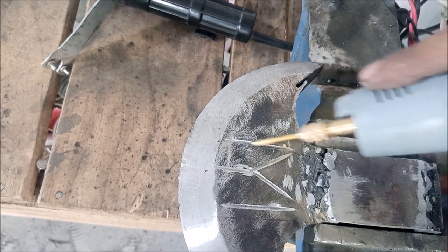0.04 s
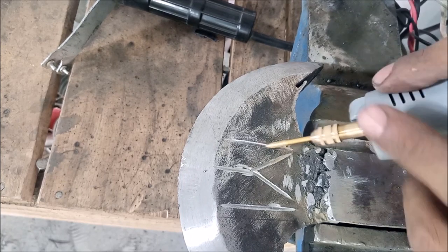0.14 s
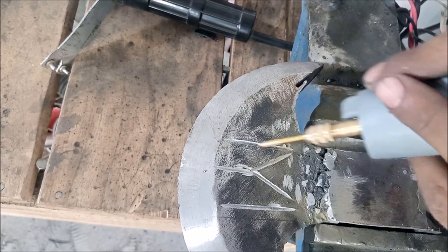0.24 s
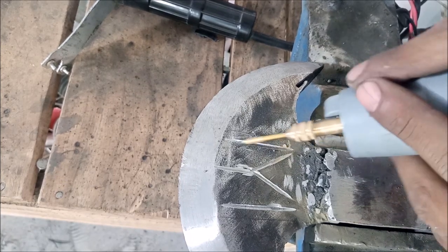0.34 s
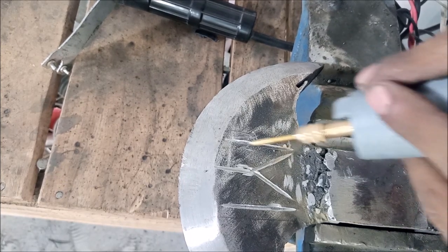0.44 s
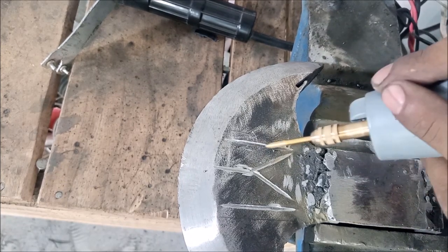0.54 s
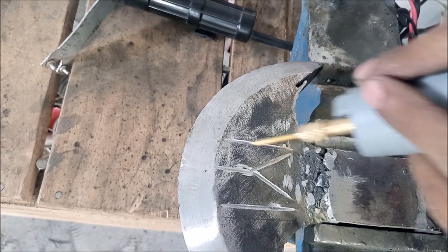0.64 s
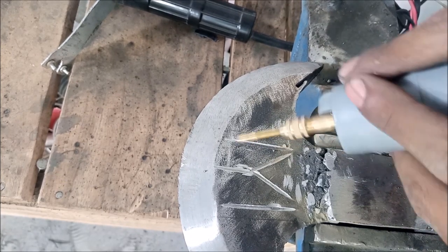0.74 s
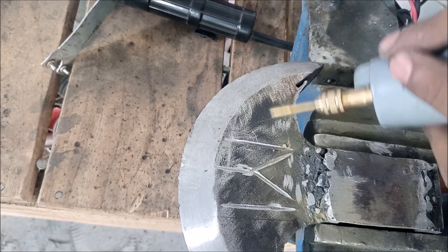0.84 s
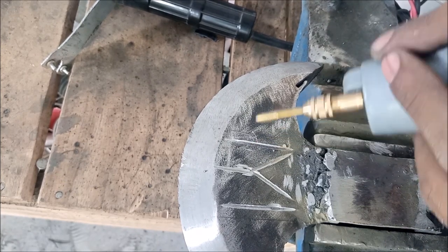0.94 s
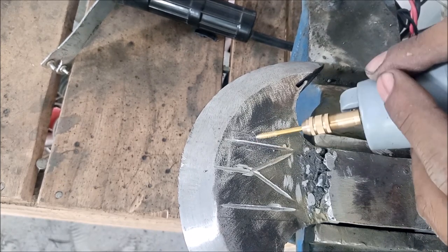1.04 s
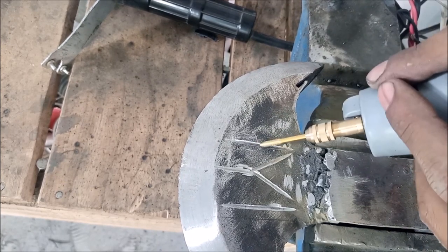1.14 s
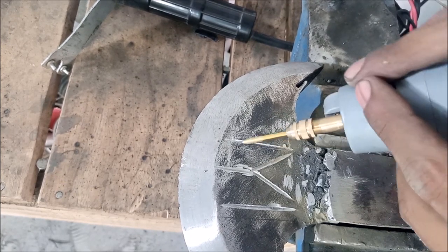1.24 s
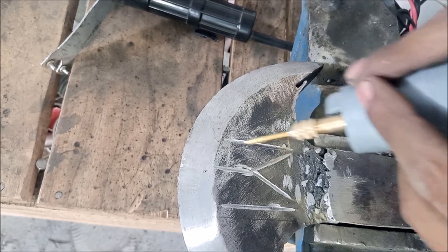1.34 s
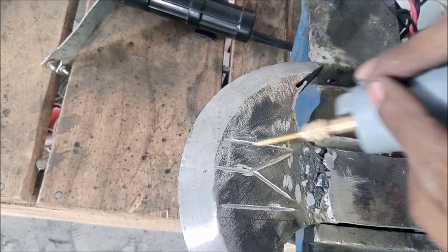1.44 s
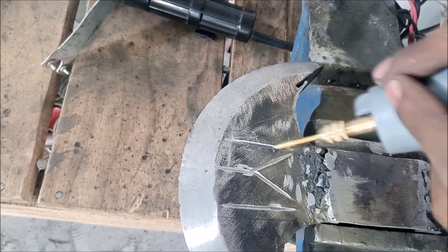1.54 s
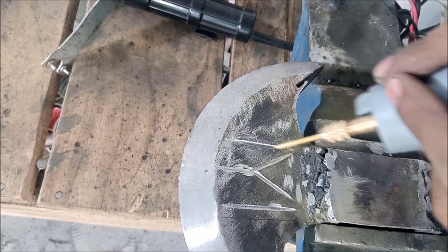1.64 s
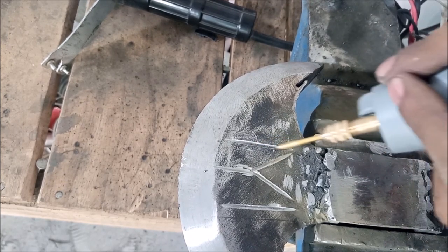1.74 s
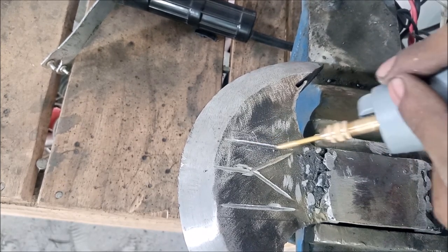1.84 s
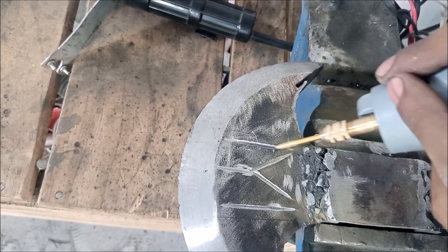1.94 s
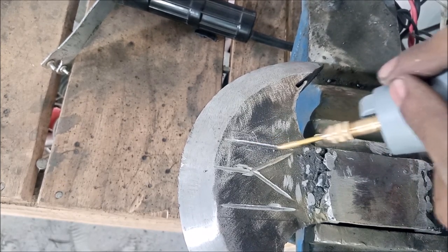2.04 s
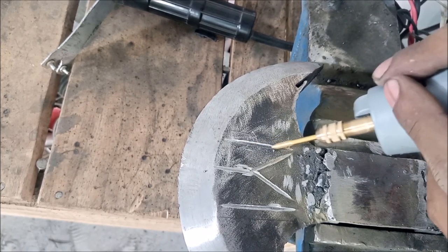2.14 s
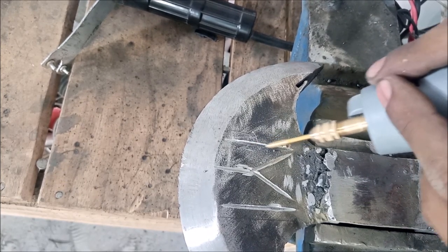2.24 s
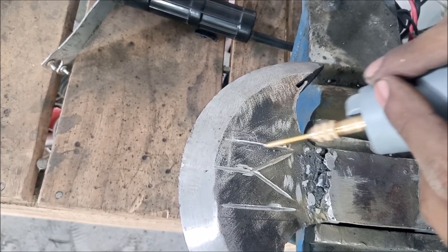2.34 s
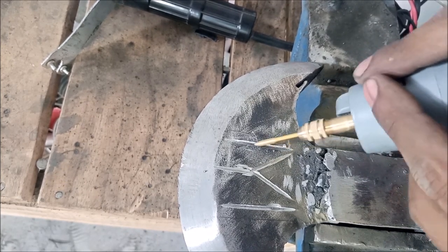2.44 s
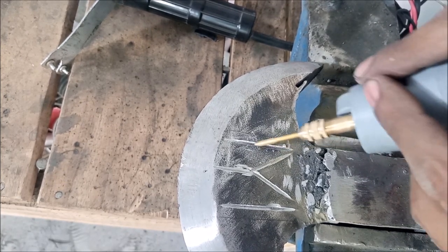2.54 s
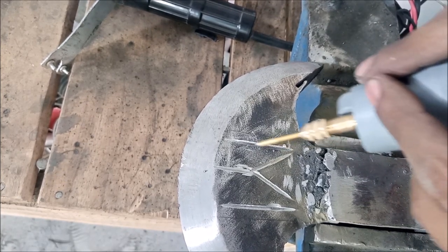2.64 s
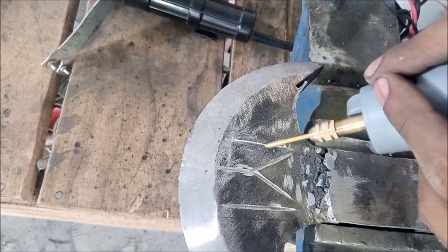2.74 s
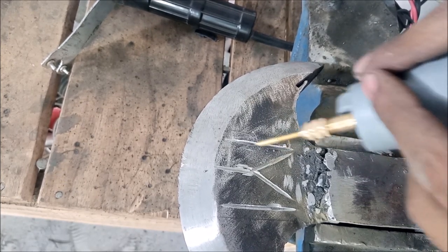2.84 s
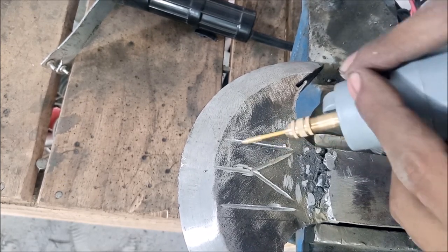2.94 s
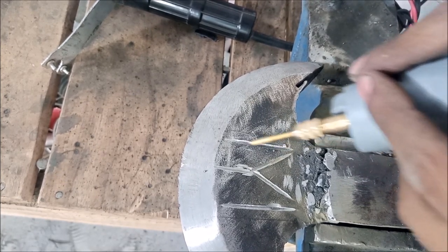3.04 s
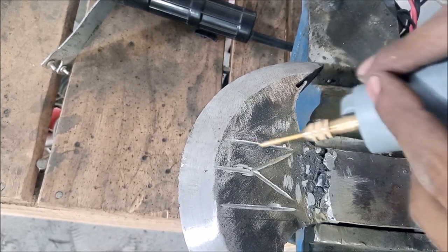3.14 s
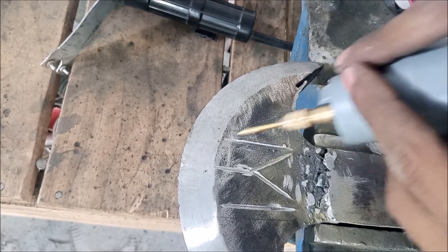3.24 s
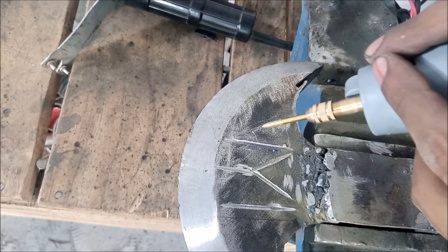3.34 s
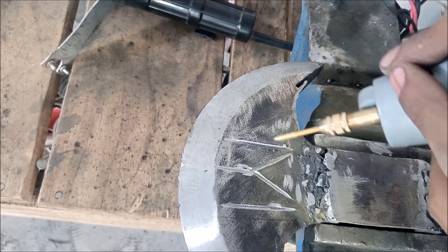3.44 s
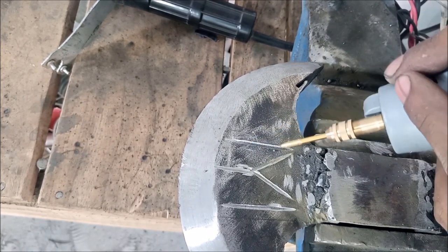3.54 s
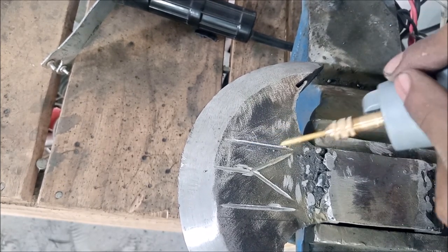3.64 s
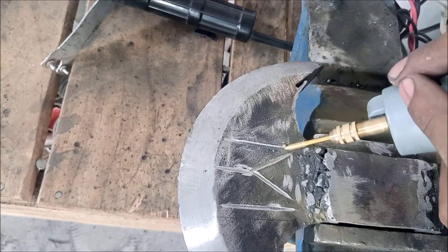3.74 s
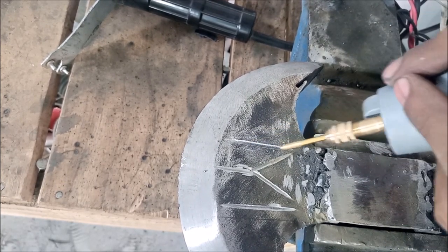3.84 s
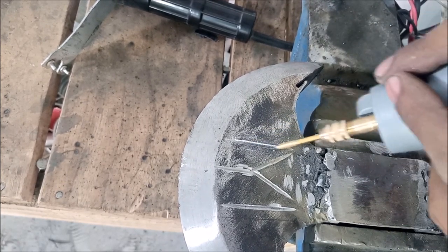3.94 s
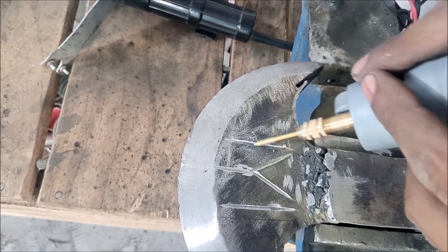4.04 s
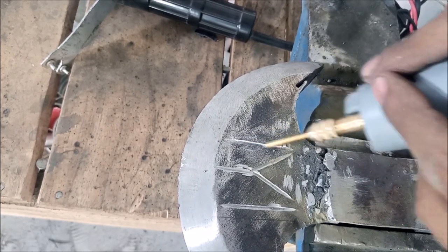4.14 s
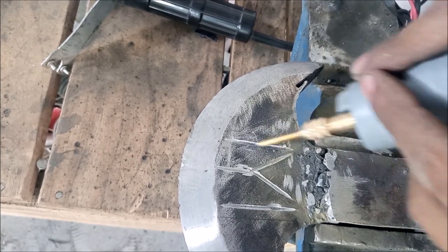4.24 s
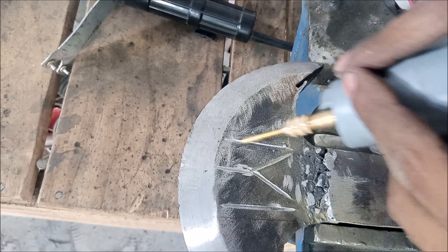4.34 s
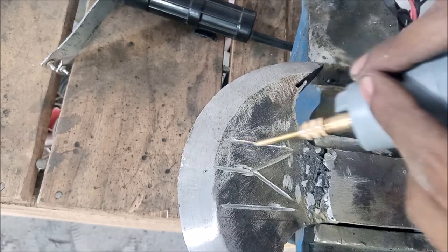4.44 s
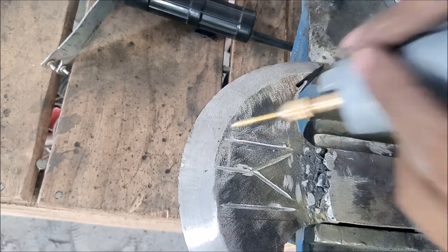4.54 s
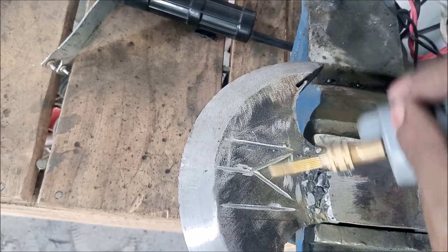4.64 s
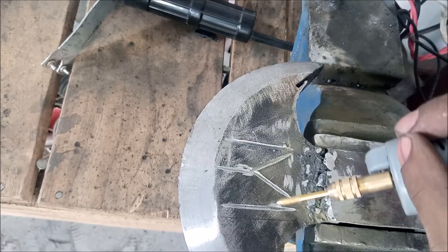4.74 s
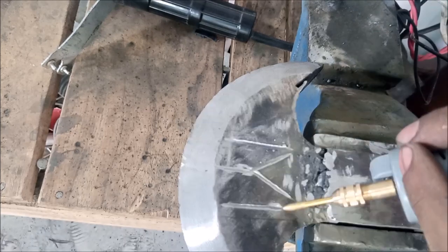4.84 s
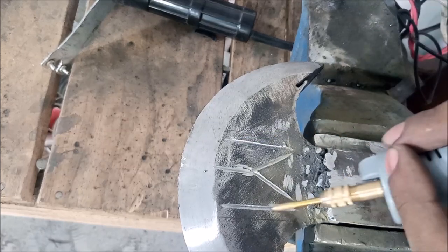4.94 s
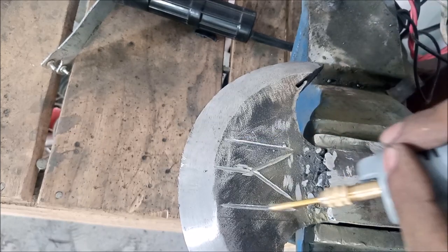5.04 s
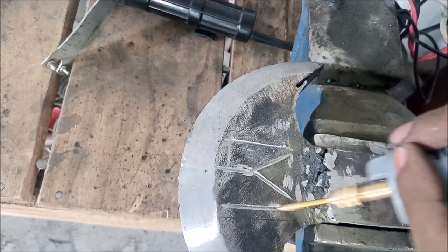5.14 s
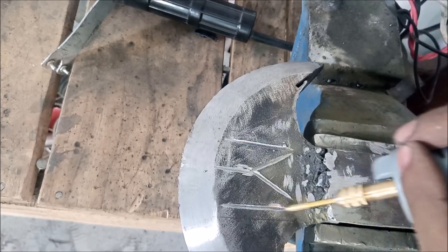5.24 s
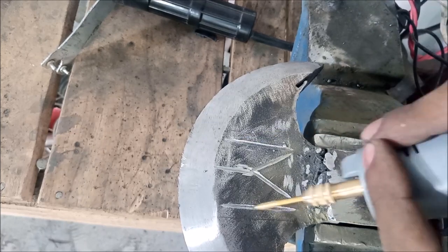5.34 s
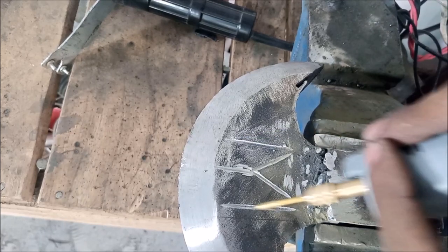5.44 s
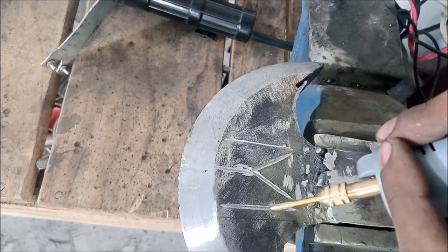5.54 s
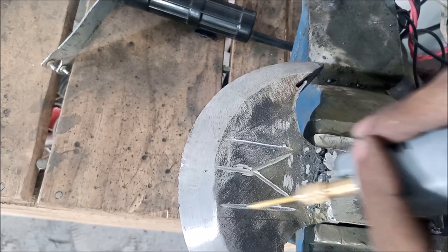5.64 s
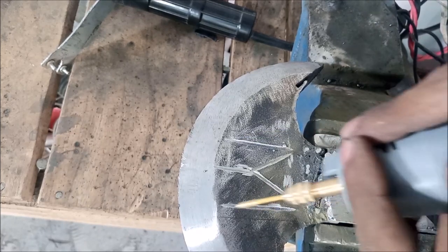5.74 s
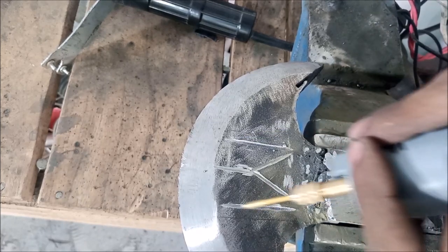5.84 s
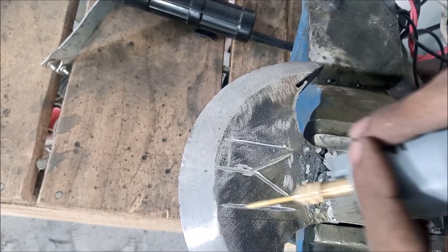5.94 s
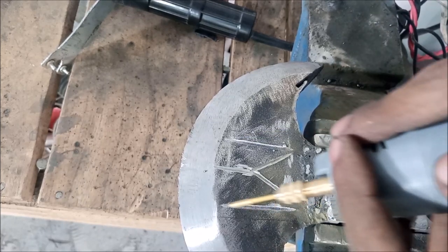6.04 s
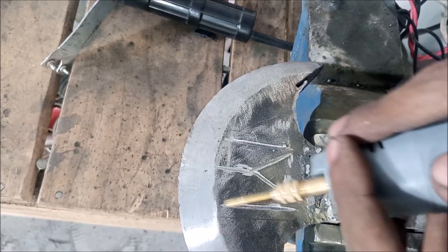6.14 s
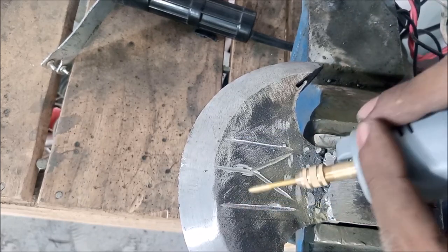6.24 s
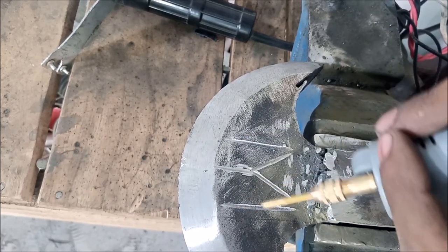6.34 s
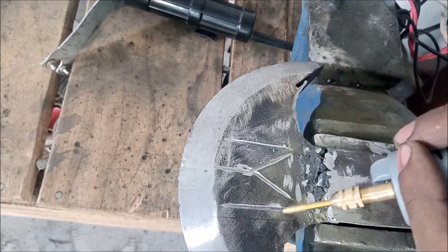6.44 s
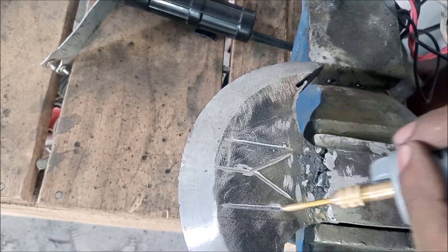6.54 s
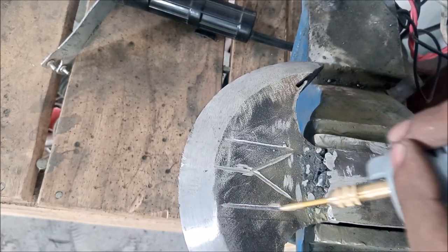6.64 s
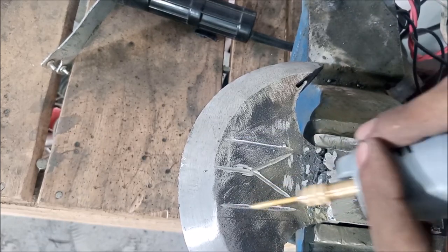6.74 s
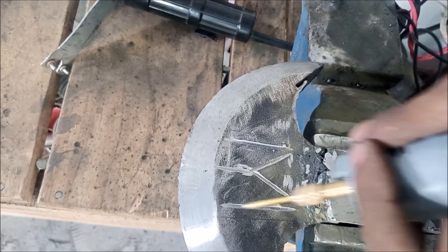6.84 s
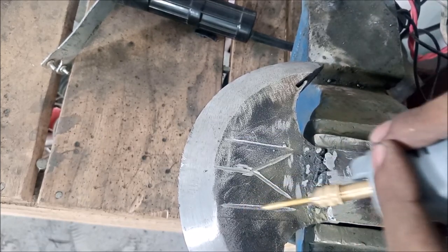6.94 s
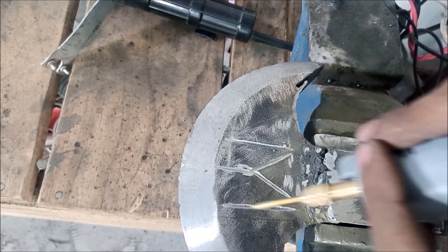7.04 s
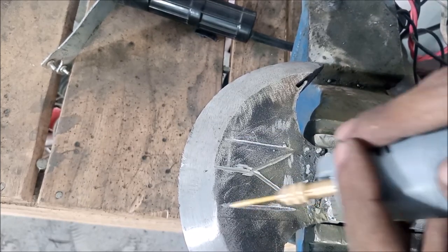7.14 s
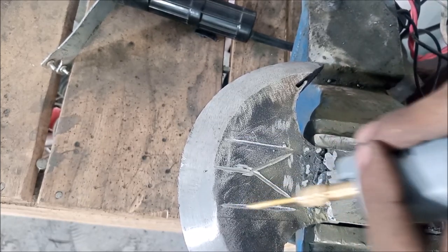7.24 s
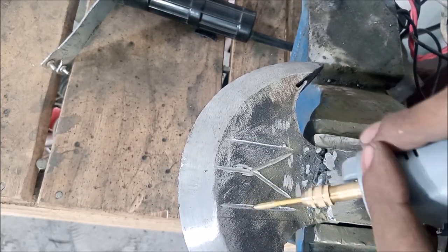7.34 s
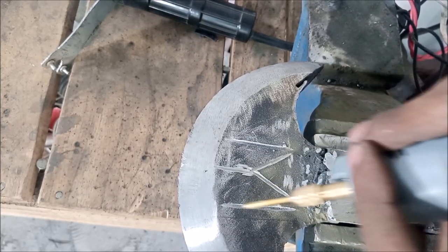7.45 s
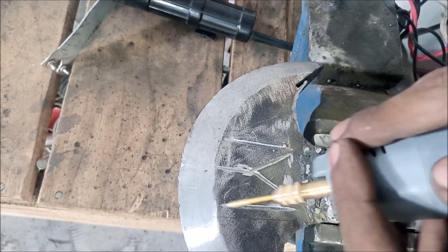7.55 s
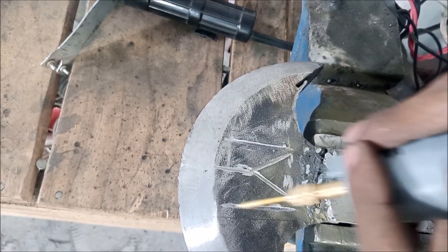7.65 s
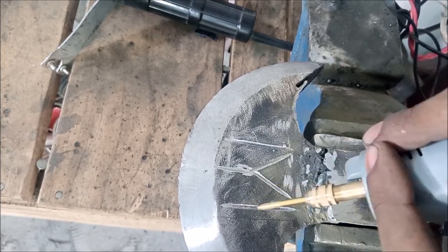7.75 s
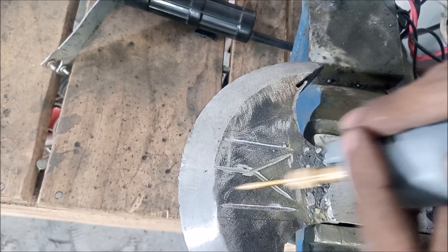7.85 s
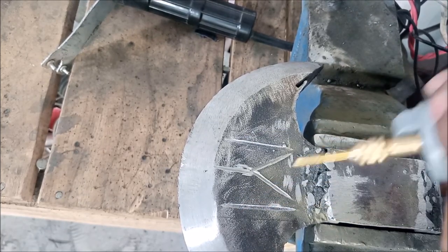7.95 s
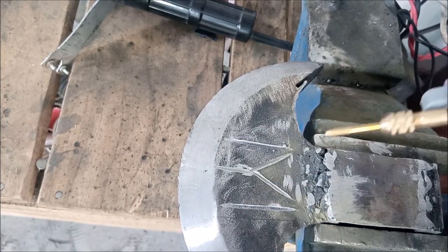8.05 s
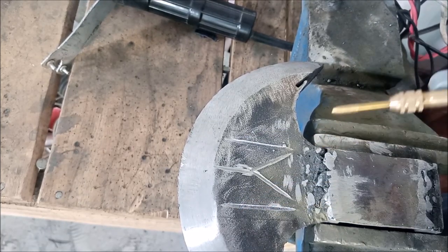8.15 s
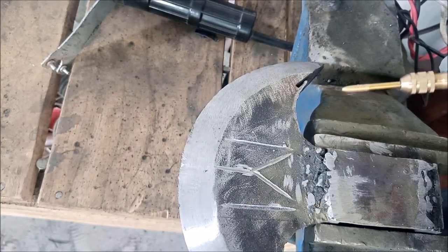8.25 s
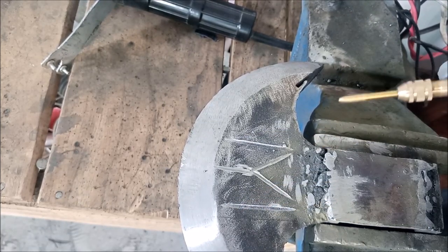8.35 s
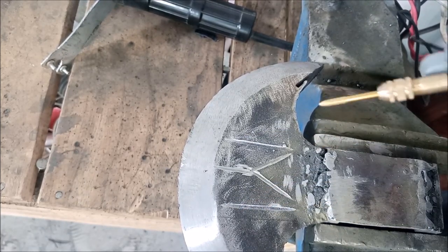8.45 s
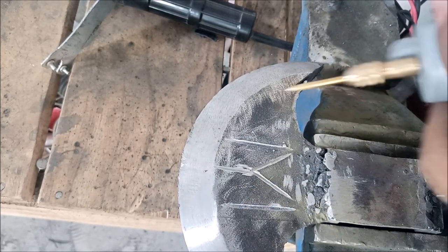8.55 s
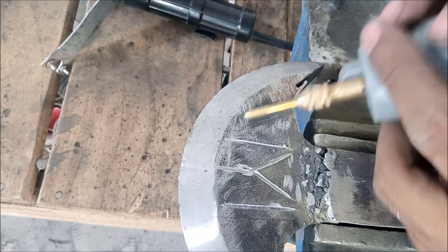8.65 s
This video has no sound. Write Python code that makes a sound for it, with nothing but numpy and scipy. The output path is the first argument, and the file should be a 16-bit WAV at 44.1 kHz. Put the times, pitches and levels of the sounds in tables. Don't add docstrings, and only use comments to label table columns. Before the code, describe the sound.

A small rotary tool buzzes and sizzles against steel in uneven strokes, its motor sagging under load, then whining freely whenever the bit lifts.

```python
import sys
import numpy as np
from scipy import signal
from scipy.fft import rfft, irfft, next_fast_len
from scipy.io import wavfile
from scipy.ndimage import uniform_filter1d, map_coordinates

SR = 44100
rng = np.random.default_rng(int(sys.argv[2]) if len(sys.argv) > 2 else 0)


def materialize(psi):
    bounded = np.clip(np.atleast_2d(psi).T, -1, 1)
    quanta = np.round(bounded * 32767).astype(np.int16)
    wavfile.write(sys.argv[1], SR, quanta)


def volts_from_decibels(level):
    exponent = np.asarray(level, float) / 20
    return 10 ** exponent


N = 382788
TIME = np.arange(N) / SR


def unit(x):
    return x / np.sqrt(np.mean(x ** 2) + 1e-20)


def curves(rows, outside=None):
    times, *columns = np.transpose(rows)
    return np.array([np.interp(TIME, times, column, outside, outside) for column in columns])


def wobble(rate):
    knots = rng.standard_normal(int(N * rate / SR) + 4)
    return map_coordinates(knots, [TIME * rate])


def coloured(x, points):
    size = next_fast_len(N + 8192)
    hz, level = np.transpose(points)
    bins = np.fft.rfftfreq(size, 1 / SR)
    gain = volts_from_decibels(np.interp(np.log(bins + 1), np.log(hz + 1), level))
    cepstrum = irfft(np.log(gain + 1e-6), size)
    cepstrum[1:size // 2] *= 2
    cepstrum[size // 2 + 1:] = 0
    response = np.exp(rfft(cepstrum))
    return unit(irfft(rfft(x, size) * response, size)[:N])


def strikes(turns, jitter, scatter_db):
    whole = np.arange(1, int(turns[-1]))
    draw = rng.standard_normal((len(whole), 2))
    at = np.interp(whole + jitter * draw[:, 0], turns, np.arange(N))
    taps = np.floor(at)[:, None] + np.arange(-7, 9)
    offset = taps - at[:, None]
    shape = np.sinc(offset) * np.cos(np.pi * offset / 16) ** 2
    sizes = volts_from_decibels(scatter_db * draw[:, 1])[:, None]
    places = np.clip(taps, 0, N - 1).astype(int)
    return np.bincount(places.ravel(), (shape * sizes).ravel(), N)


def grit(turns, gate, lumps_db):
    swell = np.exp(gate * np.cos(2 * np.pi * turns + 1.04 * wobble(120)))
    lumps = volts_from_decibels(lumps_db * wobble(900))
    return unit(swell * lumps * rng.standard_normal(N))


def cutting(turns):
    # (time [s], sizzle level [dB], rasp level [dB], buzz level [dB])
    strokes = [
        [(0.0, -33, -41.5, -46.5), (0.262, -30, -41, -49.5), (0.616, -28.5, -44.5, -51), (0.632, -32, -42, -61),
         (0.646, -27.5, -39.5, -47.5), (0.82, -28.5, -46, -53), (0.834, -27.5, -43.5, -48.5),
         (0.978, -27.5, -44.5, -53.5), (0.992, -39, -53, -64)],
        [(1.26, -31, -31.5, -44), (1.28, -36, -43, -59), (1.3, -32, -40, -44), (1.42, -29, -41, -50),
         (1.44, -32, -67, -47), (1.45, -28, -42, -50.5), (1.5, -27, -42.5, -49.5), (1.62, -28, -40, -45),
         (1.63, -32, -44, -56), (1.67, -28, -40.5, -44), (1.78, -27, -45.5, -48.5), (2.03, -28.5, -44, -49.5),
         (2.39, -29, -41, -45.5), (3.32, -27, -44, -45), (3.47, -31.5, -43, -48.5), (3.48, -37, -50, -56)],
        [(3.661, -30, -39, -50), (3.797, -30.5, -41, -51), (3.806, -36, -49, -64)],
        [(3.878, -32, -37, -54), (3.89, -30, -42, -45), (4.604, -28, -40, -44), (4.626, -30, -42, -46),
         (4.634, -32, -65, -72), (4.648, -34, -37.5, -47), (4.668, -36, -36, -43)],
        [(4.968, -28, -37.5, -44), (5.026, -30, -36, -49), (5.128, -26.5, -38.5, -46.5),
         (5.99, -30.5, -40, -44), (6.084, -29, -34.5, -42.5), (6.108, -27, -44, -73), (6.12, -29, -43, -45),
         (6.188, -31, -38.5, -49.5), (6.362, -30, -40.5, -46.5), (6.378, -32, -38, -65), (6.386, -42, -52, -49)],
        [(6.588, -32, -38.5, -62), (6.668, -28, -38.5, -43), (6.804, -29, -36.5, -46), (6.848, -28.5, -48, -46),
         (6.894, -33, -37.5, -45.5), (7.0, -29.5, -40.5, -45), (7.564, -31, -39.5, -46), (7.576, -29, -40, -69),
         (7.592, -31, -39, -46), (8.022, -30, -40.5, -45.5), (8.056, -41, -46, -56)],
    ]
    # (frequency [Hz], level [dB])
    sizzle_tone = [(5590, -35.5), (9500, -15.5), (10800, -10.5), (11100, -25), (11200, -12), (12100, -13),
                   (13000, 2), (13600, 4), (14700, 2), (16000, -17.5)]
    rasp_tone = [(1650, -42), (2800, -15), (3490, -11), (3820, -5), (4730, -1.5), (6330, -11.5),
                 (7510, -2.5), (9010, -7), (10000, -8.5), (11200, -3), (12000, -4), (15600, -40),
                 (22000, -120)]
    buzz_tone = [(180, -28), (300, -11), (542, -43), (1030, 1.5), (1330, 7.5), (1620, 6), (2120, 5.5),
                 (2610, 6), (3200, -6), (4710, 4.5), (6500, -0.5), (8450, -42), (14300, -120)]

    levels = sum(volts_from_decibels(curves(stroke, outside=-200)) for stroke in strokes)
    fade = volts_from_decibels(-60 * np.arange(SR // 10) / SR / 0.014)
    fade_power = fade[None] ** 2 / np.sum(fade ** 2)
    power = signal.fftconvolve(levels ** 2, fade_power, axes=1)[:, :N]
    sizzle, rasp, buzz = np.sqrt(np.abs(power))

    knock = unit(strikes(turns, jitter=0.011, scatter_db=0.5))
    loose_blows = unit(strikes(turns, jitter=0.2, scatter_db=5))
    chips = coloured(grit(turns, gate=0.29, lumps_db=0) + 0.5 * loose_blows, sizzle_tone)
    scrape = coloured(grit(turns, gate=0.29, lumps_db=1) + 0.33 * knock, rasp_tone)
    body = coloured(knock + 0.63 * grit(turns, gate=0.26, lumps_db=5.5), buzz_tone)

    bite = wobble(14)
    bright = sizzle * volts_from_decibels(0.93 * bite + 0.99 * wobble(30)) * chips
    gritty = rasp * volts_from_decibels(1.05 * bite) * scrape
    buzzing = buzz * volts_from_decibels(1.4 * bite + 1.26 * wobble(11) + 1.5) * body
    return bright + gritty + buzzing


def disc():
    # (time [s], level [dB])
    ringing = [(0.0, -44), (0.22, -50), (0.26, -38), (0.34, -47), (0.84, -43), (0.99, -45), (1.21, -64),
               (1.31, -48), (1.59, -37), (1.74, -49), (1.76, -46), (2.0, -53), (2.37, -51), (2.39, -43),
               (2.56, -52), (2.61, -46), (2.9, -47), (2.97, -33), (3.07, -45), (3.12, -34), (3.22, -44),
               (3.31, -46), (3.5, -32), (3.62, -40.5), (3.72, -53), (3.82, -44), (4.13, -52), (4.23, -35),
               (4.3, -48), (4.5, -36), (4.62, -41), (4.67, -33.5), (4.76, -44.5), (4.81, -41), (4.93, -49),
               (4.98, -52), (5.75, -40), (5.83, -45), (5.92, -35), (6.02, -42), (6.07, -34), (6.11, -54),
               (6.21, -37), (6.24, -44), (6.41, -35.5), (6.55, -46), (6.79, -45), (6.86, -48), (6.94, -33),
               (6.99, -44), (7.06, -36), (7.13, -45), (7.2, -39), (7.28, -49), (7.35, -42), (7.59, -40.5),
               (8.0, -36), (8.07, -29), (8.17, -35.5), (8.34, -50), (8.66, -70), (8.68, -75)]
    loudness = volts_from_decibels(curves(ringing)[0] + 0.8 * wobble(25))
    ring_hz = 11600
    return np.sqrt(2) * loudness * np.sin(2 * np.pi * ring_hz * TIME + 0.34 * wobble(14))


def motor(turns):
    # (multiple of the shaft speed, level [dB])
    multiples = [(1, -5.5), (2, -4.5), (3, 0), (4, -8), (5, -5.5), (6, 2.5), (7, -9), (8, -2), (9, -9.5),
                 (10, 2.5), (11, 0), (12, -24), (13, -4), (14, -11.5), (15, -1.5), (16, -14), (17, -6),
                 (18, -23), (19, -8), (20, -21), (21, -17), (22, -31), (23, -35), (24, -31), (25, 2.5),
                 (26, -10), (27, 4.5), (28, -12), (29, 3), (30, -10), (31, 4), (32, -3), (33, -2), (34, -2),
                 (35, -6), (36, 2), (37, -12), (38, -27), (39, -4)]
    # (frequency [Hz], level [dB])
    hiss_tone = [(290, -38), (500, -11.5), (1060, -7), (1190, -4.5), (2130, -6), (3540, -13), (3810, -5.5),
                 (3980, -9.5), (8330, -11), (10800, -9), (16000, -12.5)]
    whine = np.zeros(N)
    for multiple, db in multiples:
        tone = np.sin(2 * np.pi * (multiple * turns + rng.random()))
        whine += volts_from_decibels(db + 2.4 * wobble(6)) * tone
    hiss = coloured(rng.standard_normal(N), hiss_tone)
    return volts_from_decibels(-51) * unit(whine) + volts_from_decibels(-51.5) * hiss


def workshop():
    # (frequency [Hz], level [dB])
    hum_tones = [(132, -3.5), (265, -7), (535, -12), (662, 0), (747, -23)]
    # (frequency [Hz], level [dB])
    rumble_tone = [(15, -86), (25, -63), (124, -4.5), (303, -8.5), (334, -13), (392, -8.5), (570, -14.5),
                   (648, -5.5), (1090, -21.5), (1200, -7), (1560, -30), (2640, -120)]
    hum = np.zeros(N)
    for hz, db in hum_tones:
        tone = np.sin(2 * np.pi * hz * TIME + 1.3 * wobble(9))
        hum += volts_from_decibels(db + 3.1 * wobble(18)) * tone
    rumble = volts_from_decibels(2.0 * wobble(20)) * coloured(rng.standard_normal(N), rumble_tone)
    return rumble + 0.68 * hum


def bumps():
    # (time [s], peak level [dB], pitch [Hz], time to fade by 60 dB [s])
    thuds = [(0.328, -44.5, 215, 0.044), (0.459, -57, 188, 0.056), (0.528, -52, 194, 0.069),
             (0.89, -50, 188, 0.054), (0.985, -37.5, 246, 0.06), (1.209, -45, 279.7, 0.061),
             (1.249, -46.5, 135, 0.05), (2.259, -54, 183.2, 0.06), (3.287, -51, 148, 0.056),
             (3.475, -51, 143, 0.063), (3.812, -47, 128.8, 0.06), (3.839, -43, 129.3, 0.062),
             (4.325, -41, 179, 0.063), (4.359, -44, 277, 0.06), (4.445, -51, 151, 0.06),
             (4.662, -53, 137.7, 0.06), (5.359, -52, 261, 0.06), (5.463, -53, 253, 0.067),
             (6.387, -40, 307, 0.062), (6.409, -41, 135, 0.072), (6.44, -40.5, 205, 0.056),
             (7.411, -49.5, 178, 0.058), (7.529, -50, 186.3, 0.06), (8.049, -50, 148, 0.058),
             (8.109, -42.5, 132.2, 0.065), (8.189, -46, 237, 0.06)]
    out = np.zeros(N + SR)
    t = np.arange(SR // 5) / SR
    soft = signal.butter(2, [90, 520], "band", fs=SR, output="sos")
    for start, db, hz, fade_time in thuds:
        puff = unit(signal.sosfilt(soft, rng.standard_normal(len(t))))
        swell = 1 - np.exp(-t / 0.0065)
        fade = volts_from_decibels(-60 * t / fade_time)
        thud = np.sin(2 * np.pi * hz * t) + 0.61 * puff
        out[round(start * SR):][:len(t)] += volts_from_decibels(db + 9) * swell * fade * thud
    return out[:N]


def scene():
    # (time [s], speed [turns per second])
    shaft_speed = [(0.0, 380), (0.481, 350), (0.521, 360), (0.609, 350), (0.656, 360), (0.721, 340),
                   (0.751, 342.8), (0.786, 380), (0.873, 356), (0.925, 380), (0.99, 350), (1.005, 399.0),
                   (1.277, 399), (1.382, 350), (1.437, 357), (1.494, 333), (1.514, 336), (1.534, 356),
                   (1.559, 350), (1.624, 298), (1.659, 355), (1.756, 331.8), (1.796, 353), (1.868, 346),
                   (1.923, 365.9), (1.963, 342.4), (2.028, 361.4), (2.075, 340), (2.12, 356), (2.183, 340),
                   (2.23, 366.7), (2.275, 343.6), (2.33, 370), (2.372, 332.4), (2.42, 360), (2.477, 333),
                   (2.524, 368), (2.592, 315), (2.632, 350), (2.694, 336), (2.736, 367), (2.796, 345),
                   (2.854, 359.4), (2.938, 350), (2.991, 353), (3.063, 336), (3.125, 355), (3.208, 340),
                   (3.258, 356), (3.355, 328), (3.412, 370), (3.46, 369.9), (3.49, 407), (3.53, 399),
                   (3.66, 399), (3.956, 375), (4.053, 341.7), (4.113, 356), (4.21, 330), (4.258, 340),
                   (4.34, 297), (4.393, 318), (4.5, 284), (4.545, 369.4), (4.605, 337), (4.639, 360),
                   (4.687, 380), (4.73, 398.9), (4.984, 399), (5.081, 350), (5.161, 363), (5.211, 334.9),
                   (5.258, 362.4), (5.35, 330), (5.393, 350), (5.478, 323.8), (5.565, 336), (5.627, 287),
                   (5.67, 330.9), (5.747, 300), (5.814, 333), (5.887, 304), (5.932, 290), (5.946, 334.2),
                   (5.974, 320), (6.004, 301.8), (6.041, 290), (6.076, 340), (6.173, 353), (6.201, 383),
                   (6.263, 330), (6.296, 334), (6.333, 370), (6.38, 370), (6.39, 410), (6.43, 399),
                   (6.6, 399), (6.662, 404), (6.747, 345), (6.8, 370), (6.887, 300), (6.929, 353.4),
                   (7.022, 290), (7.074, 323), (7.126, 263.3), (7.164, 267), (7.209, 330), (7.261, 337),
                   (7.323, 350), (7.421, 330), (7.471, 365), (7.548, 284), (7.57, 289.9), (7.583, 330),
                   (7.61, 370), (7.655, 293), (7.678, 300), (7.715, 346), (7.765, 340), (7.817, 344),
                   (7.86, 367.5), (7.937, 300), (7.962, 300), (8.064, 386), (8.1, 398.8), (8.3, 399.3),
                   (8.4, 399.8), (8.68, 399.8)]
    # (time [s], hum level [dB], free whine level [dB])
    let_through = [(0.0, -68, 1.5), (0.53, -65, -3.5), (0.87, -69.5, -2), (0.99, -56, 3), (1.14, -57, 0.5),
                   (1.21, -58, 2.5), (1.33, -65, 1), (1.69, -70, -6), (1.86, -74.5, -6), (2.78, -67.5, -2),
                   (3.24, -72, -2.5), (3.67, -58, 3.5), (4.16, -68.5, 1.5), (4.37, -63, 0.5),
                   (4.5, -68, -3), (4.69, -64, 4.5), (4.83, -56, 2.5), (5.12, -69, 0.5), (5.53, -71.5, -3),
                   (5.66, -65, -7), (5.87, -72, -1), (5.97, -76, -7), (6.28, -70, -1), (6.5, -54, 3),
                   (6.72, -69.5, -2), (7.42, -65.5, -4.5), (7.86, -69.5, -7), (8.05, -60, 4),
                   (8.24, -55.5, 2.5), (8.68, -60.5, 3)]
    speed = uniform_filter1d(curves(shaft_speed)[0], size=SR // 60)
    turns = np.cumsum(speed) / SR
    hum_db, whine_db = curves(let_through)
    mono = cutting(turns) + disc() + bumps()
    mono += volts_from_decibels(whine_db) * motor(turns) + volts_from_decibels(hum_db) * workshop()
    return np.array([mono, mono])


def roll_off(x):
    return signal.sosfilt(signal.butter(12, 16660, fs=SR, output="sos"), x)


def record(dry):
    size = next_fast_len(N)
    passed = np.fft.rfftfreq(size, 1 / SR) < 15870
    mix = irfft(rfft(dry, size) * passed, size)[:, :N]
    return roll_off(mix)


dry = scene()
out = record(dry)
materialize(out)
```